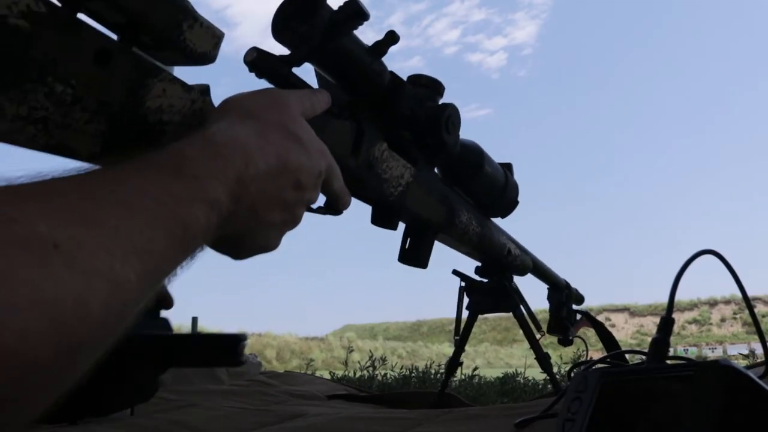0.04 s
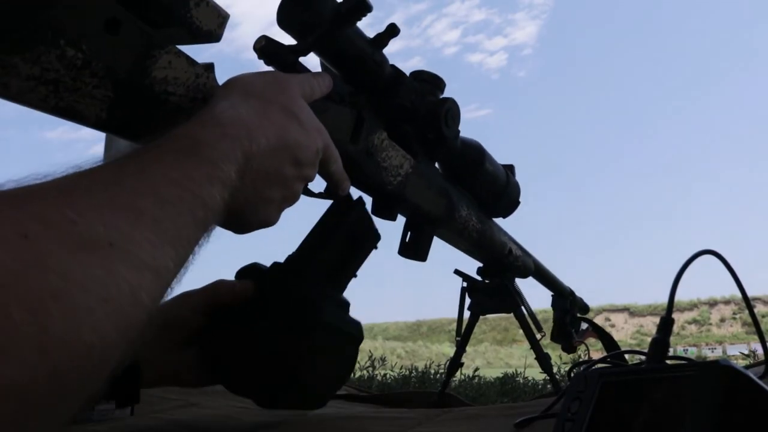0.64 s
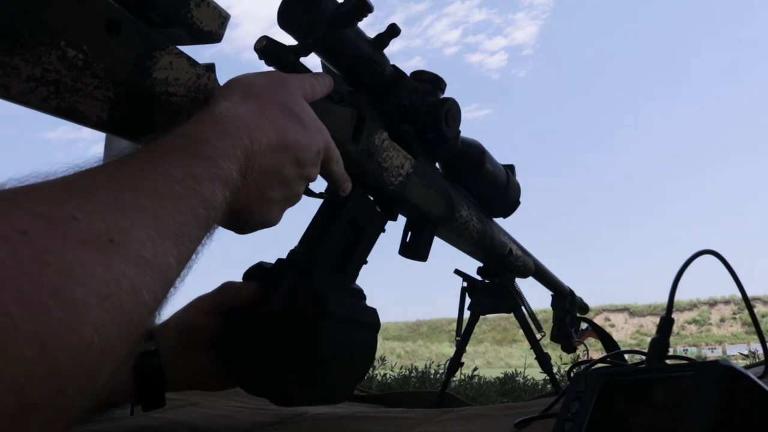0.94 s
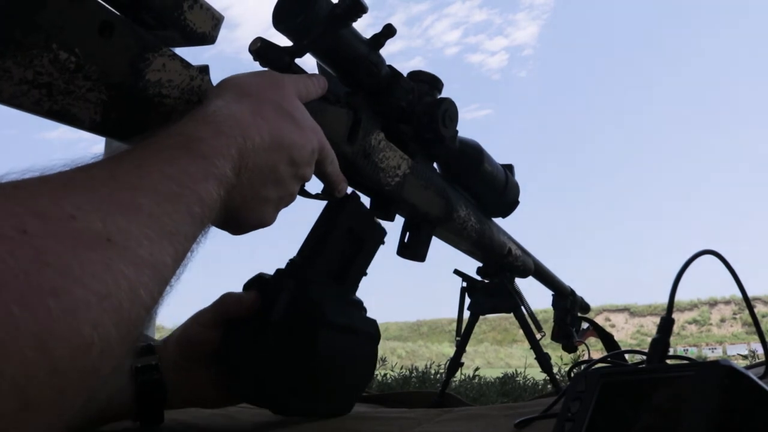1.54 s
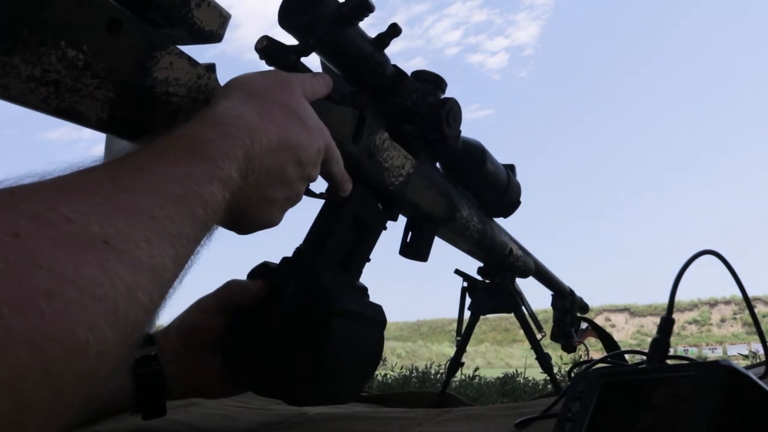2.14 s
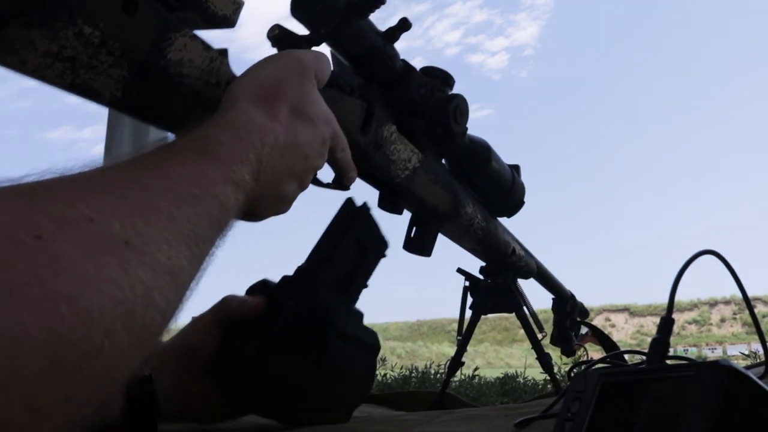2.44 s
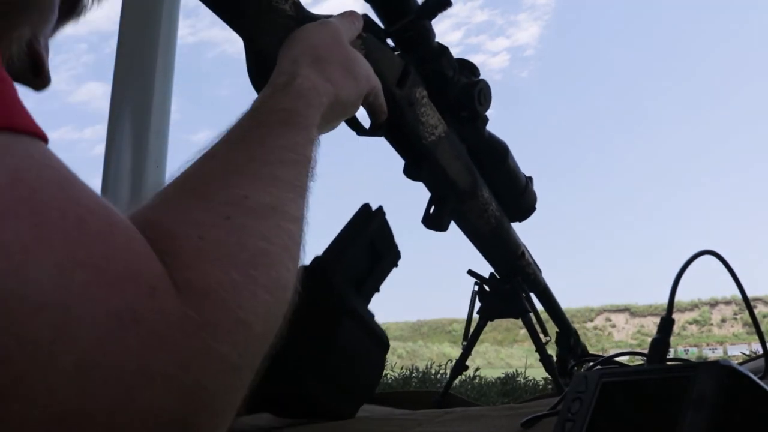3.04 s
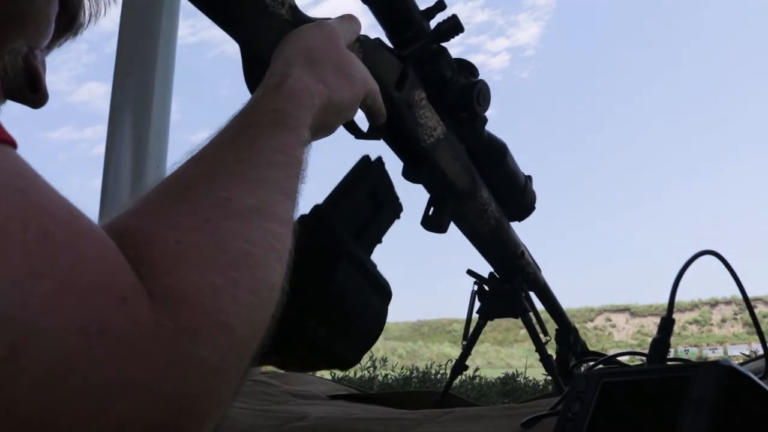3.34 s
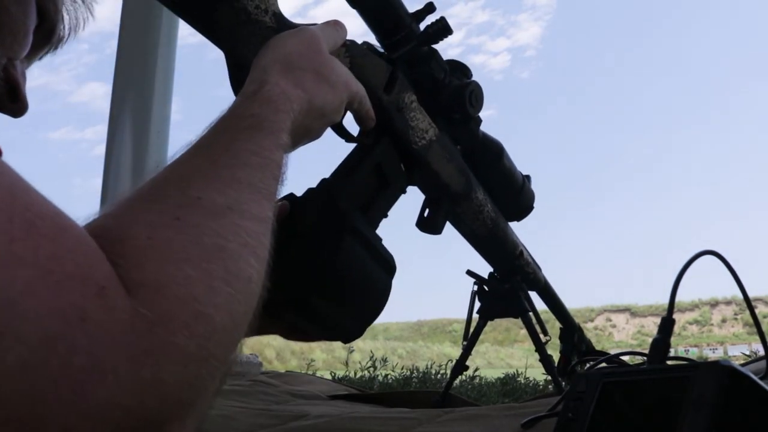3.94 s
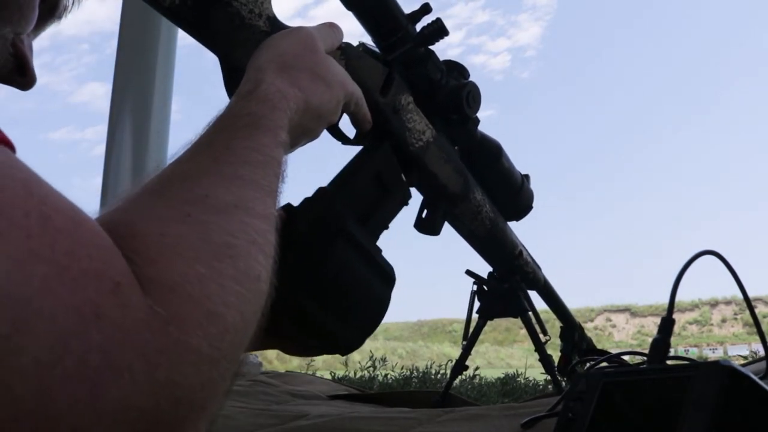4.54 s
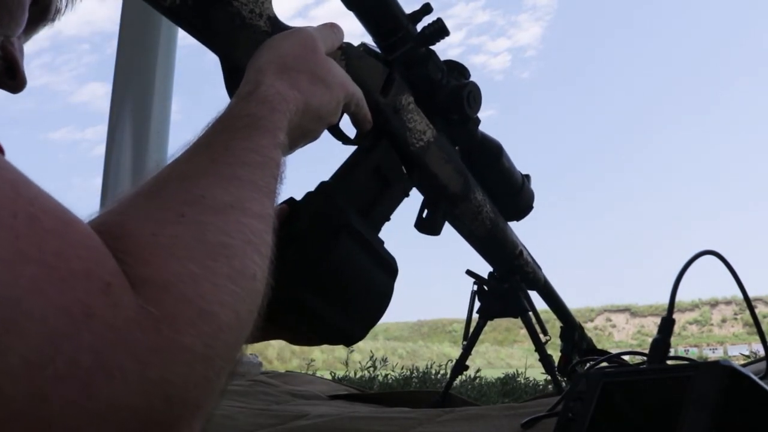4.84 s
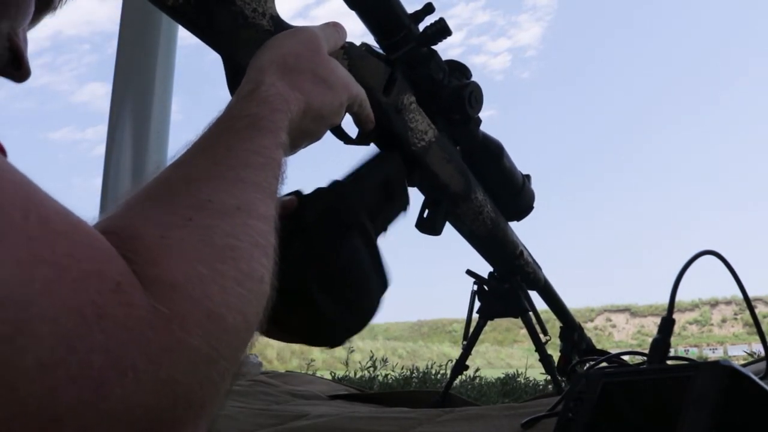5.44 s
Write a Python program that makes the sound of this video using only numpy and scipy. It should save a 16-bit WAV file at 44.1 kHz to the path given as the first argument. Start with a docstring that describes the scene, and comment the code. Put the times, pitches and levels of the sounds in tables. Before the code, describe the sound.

Sharp metallic clicks, knocks and scrapes of a drum magazine tried in a bolt-action rifle, with two loud snaps and light wind.

```python
"""At a shooting bench under the roof of a firing line, a drum magazine is tried in a bolt-action rifle.
Impacts in the well excite the modes of its hollow shell, and sliding friction makes it scrape.
The bolt grates, the spring-driven action snaps twice, and the magazine is drawn out again.
An arm brushes over the bench, the turbulence of a light wind buffets the microphone,
and the roof returns a brief reverberation."""
import sys
import numpy as np
from scipy import signal
from scipy.fft import rfft, irfft, next_fast_len
from scipy.io import wavfile
from scipy.ndimage import uniform_filter1d, map_coordinates

SR = 44100
rng = np.random.default_rng(int(sys.argv[2]) if len(sys.argv) > 2 else 0)


def log_audio(samples):
    """Write samples as a 16-bit WAV file to the path given in sys.argv[1]."""
    # one column per channel
    frames = np.atleast_2d(samples).T
    # limit to full scale, then quantise
    limited = np.clip(frames, -1, 1)
    pcm = np.round(limited * 32767).astype(np.int16)
    wavfile.write(sys.argv[1], SR, pcm)


N = 246651

# Levels are relative within each table.
# impacts of the magazine in its well: time_s, level_db, hollow_db, treble_db
KNOCKS = [(0.1949, -16.5, -10.5, -11.5), (0.2014, -21, -7, -4), (0.2515, -26, -15, -13),
          (0.279, -26, -26, -12), (0.375, -15.5, -25, -5), (0.5172, -21.5, -10.5, -11.5),
          (0.764, -20, 0.5, 1), (0.775, -13.5, 1, 0), (0.7801, -8, 1, 10.5), (0.803, -17.5, -12, -9),
          (0.9039, -31, -5.5, -10), (1.0112, -24, -3.5, -6), (1.0536, -26.5, 2, -7),
          (1.064, -21.5, -4.5, -6), (1.1637, -13.5, -16.5, -7.5), (1.19, -17, -4, -6),
          (1.207, -16, -11, -7.5), (1.2402, -28, -24.5, -11.5), (1.31, -30.5, -9, -16),
          (1.3893, -5, -8.5, 0), (1.397, -9, -14, -6), (1.419, -15.5, -9, -10), (1.5263, -4, -4.5, 4.5),
          (1.559, -23.5, -6, -26), (1.679, -10.5, -3.5, -10.5), (1.6867, -5.5, -5.5, -0.5),
          (1.6948, -11, -1.5, -0.5), (1.715, -20.5, -28, -10), (2.5501, -32.5, -20, -11),
          (2.787, -36, -11, -37), (2.86, -31.5, -2.5, -30), (3.061, -37, -5.5, -28.5),
          (3.5338, -39, -5, -12), (3.6609, -16.5, -3, 0.5), (3.67, -15, -13, -9), (3.7384, -14.5, -3, -2.5),
          (4.0415, -29, -7.5, -12), (4.069, -14, -22, -11.5), (4.135, -22, -8.5, -6),
          (4.263, -17, -23, -4.5), (4.3262, -28, -13, -26), (4.66, -13.5, -3, -12), (4.667, -9.5, -16, 4),
          (4.6871, -15, -12, -8), (4.758, -5.5, -12, 2), (4.7705, -16, -8, -15), (4.8245, -27.5, -22, -12),
          (4.895, -37.5, -4, -17), (5.478, -14, -11.5, 2.5), (5.517, -16, -17, -3), (5.525, -17, -18, -13)]
# modes of the hollow magazine: pitch_hz, level_db, t60_s
SHELL_MODES = [(741, -16.5, 0.064), (1065, -3, 0.024), (1262.5, 4.5, 0.033), (1304, -5, 0.05),
               (2182, -14.5, 0.069), (2506, -27, 0.056)]
# spectrum of an impact: frequency_hz, level_db
CRACK_SPECTRUM = [(550, -13.5), (720, -3.5), (880, -9), (1200, -3), (2150, 1.5), (3400, 5.5), (4700, 1),
                  (7000, 5), (10000, -2), (12500, -7), (15000, -12), (17000, -25)]
# the action snapping home, with its rebounds: start_s, level_db, treble_db, ring_db
SNAPS = [(3.1928, 1, 3, 8), (3.2014, -20, 4.5, -3), (4.1962, 3.5, 3, -0.5), (4.2, 1, 1, 0),
         (4.207, -11, 2.5, 10.5)]
# spectrum of snapping and rubbing parts: frequency_hz, level_db
ACTION_SPECTRUM = [(120, -24), (500, -10.5), (1100, 2.5), (1500, -0.5), (2750, 3.5), (4200, -2),
                   (10500, -3), (14500, -15), (17000, -21.5)]
# resonances of the steel: centre_hz, width_hz, share
STEEL_RESONANCES = [(2720, 290, 1), (4300, 140, 0.4), (6200, 350, 0.55), (7610, 120, 0.85)]
# the magazine sliding along its guides: centre_s, length_s, level_db
SCRAPES = [(0.082, 0.22, -51), (0.285, 0.045, -46.5), (0.419, 0.15, -49), (0.662, 0.078, -50),
           (3.764, 0.16, -48.5), (4.245, 0.083, -44.5), (5.496, 0.11, -48)]
# friction of the bolt before the first snap: time_s, level_db
BOLT_FORCE = [(2.76, -60.5), (2.87, -45.5), (2.91, -41), (2.96, -54.5), (3.05, -52.5), (3.18, -47)]
# the hand shifting on the stock: centre_s, length_s, level_db
GRIPS = [(1.908, 0.046, -56.5), (2.012, 0.073, -58), (2.438, 0.19, -59.5), (2.981, 0.037, -48),
         (4.994, 0.09, -56.5)]
# likeness of the rifle's noise in the two channels: frequency_hz, correlation
RIFLE_COHERENCE = [(300, 1), (1200, 0.81), (2500, 0.043), (8000, 0.5)]
# stereo balance of the rifle: frequency_hz, left_minus_right_db
RIFLE_BALANCE = [(400, -1), (750, -1), (1250, 1.5), (2400, -3.5), (7000, -2.5), (14000, -4)]
# brushes of the arm: peak_s, release_s, level_db
BRUSHES = [(0.09, 0.16, -40.5), (2.61, 0.068, -35), (5.47, 0.026, -37.5)]
# spectrum of skin on cloth: frequency_hz, level_db
CLOTH_SPECTRUM = [(400, -19), (700, -2), (1150, 1.5), (2300, -9), (4400, -13.5), (7800, 0), (10500, -2),
                  (12500, -6.5), (15500, -10)]
# strength of the continuous wind: time_s, level_db
WIND_LEVEL = [(0, -43.5), (0.55, -51), (0.85, -45.5), (3.7, -47), (5.1, -50), (5.45, -43)]
# spectrum of its turbulence: frequency_hz, level_db
BUFFET_SPECTRUM = [(15, -28.5), (55, 1.5), (160, 1), (250, -12), (430, -20), (1200, -54)]
# gusts on the microphone, and the dull thump after the second snap:
# centre_s, length_s, level_db, edge_hz
GUSTS_AND_THUMP = [(0.081, 0.083, -42.5, 280), (0.295, 0.046, -39, 316), (1.14, 0.057, -35.5, 252),
                   (1.358, 0.05, -34.5, 318), (1.425, 0.043, -30, 360), (1.985, .11, -36, 219),
                   (3.158, 0.079, -37, 195.6), (3.351, 0.096, -37.5, 318), (3.57, 0.11, -37, 307),
                   (3.927, 0.058, -31.5, 348), (4.26, 0.068, -41.5, 700), (4.572, 0.09, -37, 230),
                   (4.731, 0.045, -29, 389), (4.804, 0.064, -33, 560), (5.303, 0.04, -40, 243),
                   (5.564, 0.033, -32.5, 293)]
# the strongest single eddies: start_s, level_db, pitch_hz
EDDIES = [(2.161, -19.5, 118), (3.3193, -11, 294.6), (3.365, -16.5, 350), (4.06, -21, 150.6),
          (4.491, -23, 217), (4.6113, -10.5, 154.6)]
# spectrum of an eddy slapping the microphone: frequency_hz, level_db
SLAP_SPECTRUM = [(300, 15.5), (1400, -6), (2500, -52)]
# reverberation time under the roof: frequency_hz, t60_s
ROOF_DECAY = [(200, 0.14), (1500, 0.26), (15000, 0.14)]
# spectrum of the open-air background: frequency_hz, level_db
AIR_SPECTRUM = [(200, -12.5), (360, -2), (800, -13), (1240, -12.5), (5000, -25.5), (12000, -23.5),
                (16000, -40)]

LEAD_S = 0.01  # a graze leads into each impact
GRAZE_DB, GRAZE_T60_S = -20.5, 0.014
REBOUND_MAX_S, REBOUND_DB, REBOUND_TREBLE_DB = 0.011, -10, -23
UNEVEN_DB, MODE_SPACING_HZ = 2.8, 230  # each point of contact favours its own resonances
LOOSE_RING_DB = -5.5  # steel resonances in rattles and scrapes
LOCKED_DAMPING = 3.1  # the closed action's resonances are this much wider


def magazine_knocks():
    """Inelastic rebound: the magazine strikes, rocks back and touches again more softly."""
    out = np.zeros((2, N))
    for time_s, db, hollow_db, treble_db in KNOCKS:
        start_s = time_s - LEAD_S
        add(out, start_s, amp(db) * impact(hollow_db, treble_db))
        delay_s = REBOUND_MAX_S * rng.uniform(0.5, 1)
        rebound = impact(hollow_db, treble_db + REBOUND_TREBLE_DB)
        add(out, start_s + delay_s, amp(db + REBOUND_DB) * rebound)
    return out


def impact(hollow_db, treble_db):
    """Impulsive excitation: one touch grazes, cracks, chatters and rings the hollow shell."""
    t = np.arange(-round(LEAD_S * SR), SR // 6) / SR
    age = np.maximum(t, 0)
    decay = amp(-7.5) * fade(age, 0.02) + amp(-12) * fade(age, 0.06) + amp(-34) * fade(age, 0.28)
    attack = 1 - fade(age, 0.0062)
    graze = amp(GRAZE_DB) * fade(np.abs(t), GRAZE_T60_S)
    force = (attack * decay + graze) * grit(len(t), depth_db=2.5)
    crack = steel_noise(CRACK_SPECTRUM, treble_db, ring_db=0, force=force, uneven_db=UNEVEN_DB)
    return crack + amp(hollow_db - 1.5) * shell_ring(age)


def shell_ring(t, scatter_db=3.5, spread_rad=0.55, detune=0.025):
    """Damped modes: grip and point of contact change their strength and pitch from blow to blow."""
    out = 0
    for hz, db, t60 in SHELL_MODES:
        phase = rng.uniform(0, 2 * np.pi) + spread_rad * rng.standard_normal((2, 1))
        pitch_hz = hz * (1 + detune * rng.standard_normal())
        gain = amp(db + scatter_db * rng.standard_normal())
        out = out + gain * fade(t, t60) * np.sin(2 * np.pi * pitch_hz * t + phase)
    return out * (1 - fade(t, 0.019))


def action_snaps():
    """Release of spring energy: steel slams shut with a ringing crack, and loose parts rattle."""
    out, t = np.zeros((2, N)), np.arange(SR // 4) / SR
    for start_s, db, treble_db, ring_db in SNAPS:
        blow = amp(-1.5) * fade(t, 0.034) * grit(len(t), depth_db=3.5)
        crack = steel_noise(ACTION_SPECTRUM, treble_db, ring_db, blow, damping=LOCKED_DAMPING)
        chatter = amp(-29.5) * fade(t, 0.15) * grit(len(t), depth_db=15)
        rattle = steel_noise(ACTION_SPECTRUM, treble_db, LOOSE_RING_DB, chatter)
        add(out, start_s, amp(db) * (crack + rattle))
    return out


def magazine_scrapes(catch_db=13):
    """Stick and slip: the magazine rubs along its guides and catches three times in each stroke."""
    out = np.zeros((2, N))
    for centre_s, length_s, db in SCRAPES:
        scrape = friction(stroke(length_s), treble_db=-4, ring_db=LOOSE_RING_DB)
        add(out, centre_s - length_s, amp(db) * scrape)
        for offset in rng.uniform(-0.54, 0.5, size=3):
            catch = impact(hollow_db=-7, treble_db=-7.5)
            add(out, centre_s + offset * length_s, amp(db + catch_db) * catch)
    return out


def bolt_slide():
    """Friction drives resonance: steel grates on steel and sings faintly until the first snap."""
    t = np.arange(N) / SR
    moving = (t > BOLT_FORCE[0][0]) & (t < SNAPS[0][0])
    return friction(moving * amp(curve(BOLT_FORCE)), treble_db=2.5, ring_db=10.5)


def friction(push, treble_db, ring_db):
    """Sliding friction: the noise of rubbing parts follows the force of an unsteady hand."""
    force = push * amp(wobble_db(len(push), rate_hz=61, depth_db=2.3))
    return steel_noise(ACTION_SPECTRUM, treble_db, ring_db, force, UNEVEN_DB / 2)


def steel_noise(spectrum, treble_db, ring_db, force, uneven_db=0, damping=1):
    """Forced vibration: a rough force shakes the rifle; treble_db makes it brighter or duller."""
    hz = np.geomspace(100, SR / 2, num=800)
    tilted = [(f, db + treble_db * np.clip(np.log(f / 3000), -0.35, 1)) for f, db in spectrum]
    peaks = sum(share / (1 + (2 * (hz - centre) / (width * damping)) ** 2)
                for centre, width, share in STEEL_RESONANCES)
    grid_hz = np.arange(0, SR / 2, MODE_SPACING_HZ)
    ripple_db = uneven_db * np.interp(hz, grid_hz, rng.standard_normal(len(grid_hz)))
    db = along(tilted, hz) + ring_db * peaks + ripple_db
    return noise(np.transpose([hz, db]), RIFLE_COHERENCE, size=len(force), drive=force)


def hand_grip():
    """Friction of soft skin: fingers creep over the stock in a faint, dull crackle."""
    out = np.zeros((2, N))
    for centre_s, length_s, db in GRIPS:
        push = stroke(length_s)
        force = push * grit(len(push), depth_db=3.5)
        crackle = steel_noise(CRACK_SPECTRUM, treble_db=-10, ring_db=0, force=force)
        add(out, centre_s - length_s, amp(db) * crackle)
    return out


def arm_brushes():
    """Friction of skin on cloth: each wide, raspy swish swells slowly and lets go quickly."""
    out, t = np.zeros((2, N)), np.arange(N) / SR
    for peak_s, release_s, db in BRUSHES:
        to_go = np.maximum(1 + (peak_s - t) / release_s, 0)
        force = (to_go * np.exp(1 - to_go)) ** 4 * grit(N, depth_db=1.5)
        out += amp(db) * noise(CLOTH_SPECTRUM, coherence=[(4000, 0.011)], drive=force)
    return out


def wind():
    """Turbulent pressure: low, fluttering gusts, each with its own upper edge, and brief eddies."""
    coherence = [(40, 1.0), (300, 0.82)]
    lumps = unit(amp(wobble_db(N, rate_hz=24, depth_db=3.2)))
    out = amp(curve(WIND_LEVEL) + 3.5) * lumps * noise(BUFFET_SPECTRUM, coherence)
    for centre_s, length_s, db, edge_hz in GUSTS_AND_THUMP:
        push = stroke(length_s)
        flutter = unit(amp(wobble_db(len(push), rate_hz=110, depth_db=3.5)))
        spectrum = [(edge_hz * ratio, level_db)
                    for ratio, level_db in [(0.1, -14), (0.5, 0), (1, -7.5), (2, -26), (6, -70)]]
        burst = push * flutter * noise(spectrum, coherence, size=len(push))
        add(out, centre_s - length_s, amp(db + 4) * burst)
    t = np.arange(SR // 16) / SR
    for start_s, db, pitch_hz in EDDIES:
        half_cycles = 2 * pitch_hz * t
        swell = amp(db) * half_cycles ** 2 * np.exp(2 * (1 - half_cycles))
        slap = amp(-4.5) * swell ** 2 * noise(SLAP_SPECTRUM, coherence, size=len(t))
        add(out, start_s, swell * np.sin(2 * np.pi * pitch_hz * t) + slap)
    return panned(out, balance=[(120, 0.72), (280, 4.7)])  # stronger on the left


def roof_reverb(x):
    """Diffuse reflection from bench, posts and roof: a short tail, longest in the middle frequencies."""
    hz, t, bands = signal.stft(rng.standard_normal((2, SR // 2)), SR, nperseg=256)
    decay = fade(t, along(ROOF_DECAY, hz)[:, None])
    tail = signal.istft(bands * decay, SR, nperseg=256)[1]
    tail *= 1 - fade(np.arange(tail.shape[1]) / SR, 0.03)
    return signal.fftconvolve(x, tail / np.linalg.norm(tail[0]), axes=1)[:, :N]


def open_air():
    """Ambient noise: a faint, steady hush whose coherence falls with frequency."""
    return amp(-55) * noise(AIR_SPECTRUM, coherence=[(300, 0.97), (3000, 0.067)])


def noise(spectrum, coherence, size=N, drive=1):
    """Source and filter: driven noise is coloured; its mid-to-side ratio sets the stereo coherence."""
    def response(hz):
        angle = np.arccos(np.clip(along(coherence, hz), -1, 1)) / 2
        return unit(amp(along(spectrum, hz))) * [np.cos(angle), np.sin(angle)]
    mid, side = filtered(drive * rng.standard_normal((2, size)), response)
    return np.array([mid + side, mid - side])


def panned(x, balance):
    """Level difference between channels, from (frequency_hz, left_minus_right_db) points."""
    return filtered(x, lambda hz: amp(along(balance, hz) * np.array([[0.5], [-0.5]])))


def filtered(x, response):
    """Linear filtering: the spectrum of x times a frequency response."""
    size = x.shape[-1]
    padded = next_fast_len(size + 4096)
    return irfft(rfft(x, padded) * response(np.fft.rfftfreq(padded, 1 / SR)), padded)[..., :size]


def grit(size, depth_db):
    """Roughness: a gain of rms 1 that jumps from one millisecond to the next."""
    return unit(amp(depth_db * unit(uniform_filter1d(rng.standard_normal(size), size=40))))


def wobble_db(size, rate_hz, depth_db):
    """Random modulation: a smooth level curve with rate_hz knots a second."""
    knots = rng.standard_normal(int(size * rate_hz / SR) + 4)
    return depth_db * map_coordinates(knots, [np.arange(size) * rate_hz / SR])


def stroke(length_s):
    """A flat-topped swell and fade, lasting twice length_s."""
    position = np.linspace(-2, 2, 2 * int(length_s * SR))
    return np.exp(-position ** 4 / 2)


def fade(t, t60):
    """Free decay, 60 dB down after t60."""
    return np.exp(-np.log(1000) * t / t60)


def along(points, hz):
    """Interpolation of (frequency_hz, value) points on a log axis."""
    frequencies, values = np.transpose(points)
    return np.interp(np.log(hz + 1), np.log(frequencies), values)


def curve(points):
    """Interpolation of (time_s, value) points at every sample."""
    return np.interp(np.arange(N) / SR, *np.transpose(points))


def amp(db):
    """Decibels to gain."""
    return 10 ** (np.asarray(db) / 20)


def unit(x):
    """x at rms 1."""
    return x / np.sqrt(np.mean(x ** 2) + 1e-20)


def add(track, start_s, sound):
    """Mix a sound into the track, starting no earlier than time zero."""
    part = track[:, max(round(start_s * SR), 0):][:, :sound.shape[-1]]
    part += sound[..., :part.shape[1]]


def scene():
    """Superposition: the rifle slightly to the right, its reflections, the arm, wind and open air."""
    rifle = magazine_knocks() + action_snaps() + magazine_scrapes() + bolt_slide() + hand_grip()
    rifle = panned(rifle, RIFLE_BALANCE)
    return rifle + amp(-15) * roof_reverb(rifle) + arm_brushes() + wind() + open_air()


def record(dry, cutoff_hz=16000):
    """Saturation rounds off the loudest snaps, and a steep low-pass limits the band."""
    clipped = dry / (1 + np.abs(dry) ** 6) ** (1 / 6)
    return filtered(clipped, lambda hz: 1 / (1 + (hz / cutoff_hz) ** 80))


dry = scene()
out = record(dry)
log_audio(out)
```